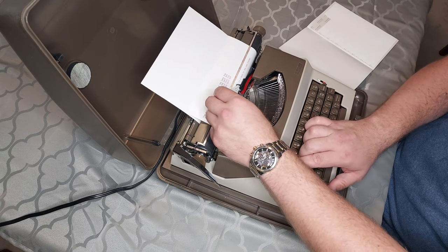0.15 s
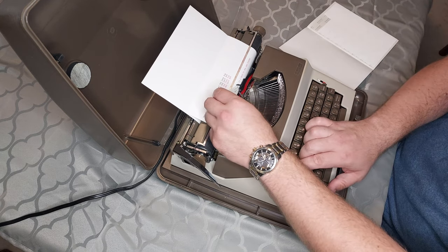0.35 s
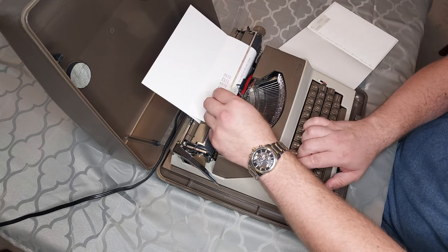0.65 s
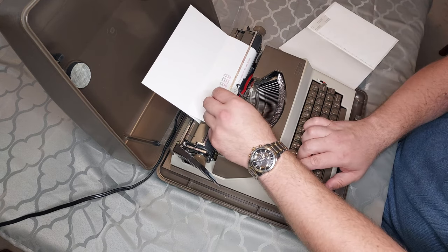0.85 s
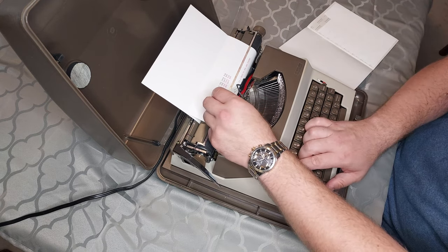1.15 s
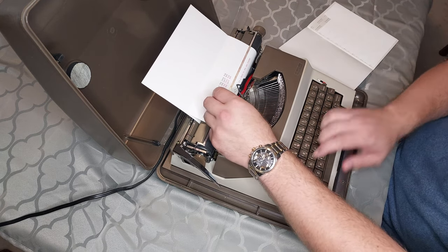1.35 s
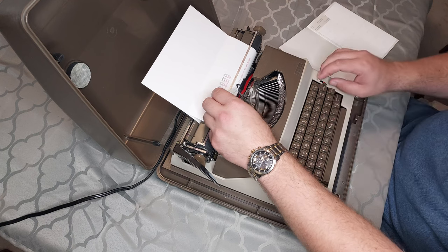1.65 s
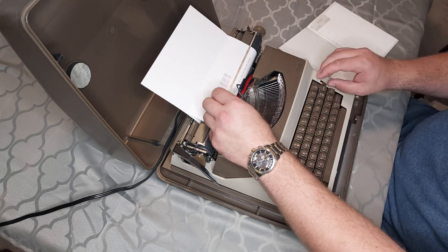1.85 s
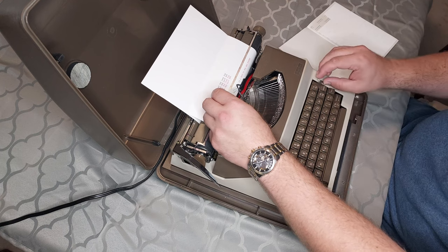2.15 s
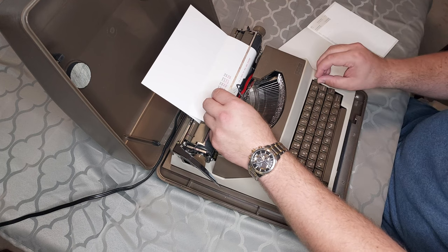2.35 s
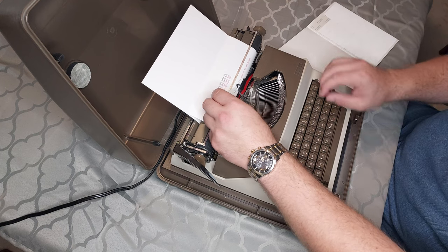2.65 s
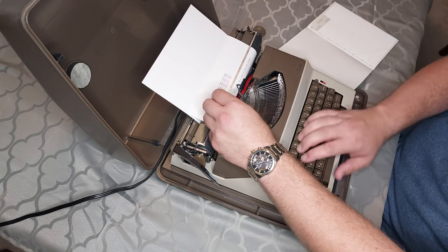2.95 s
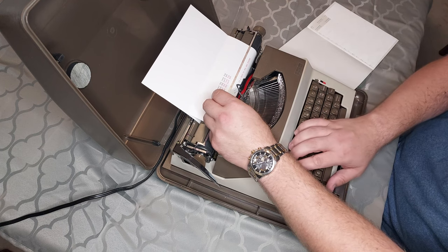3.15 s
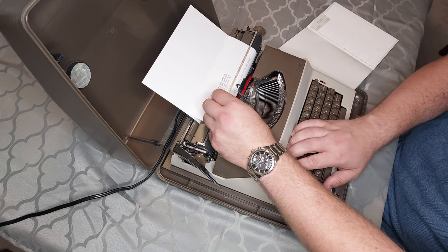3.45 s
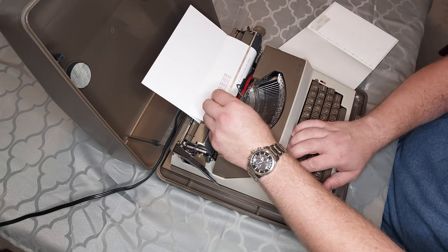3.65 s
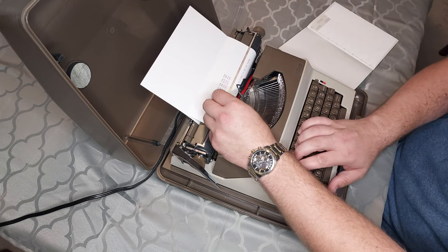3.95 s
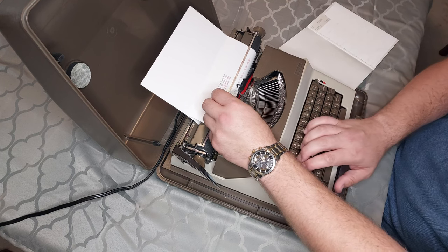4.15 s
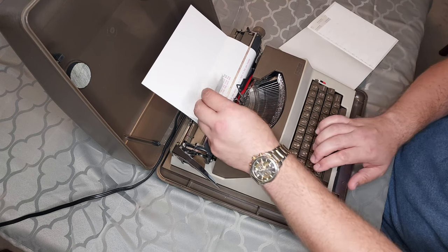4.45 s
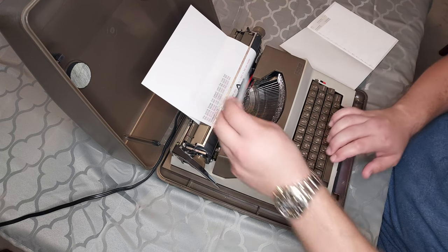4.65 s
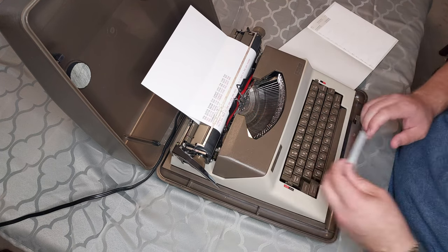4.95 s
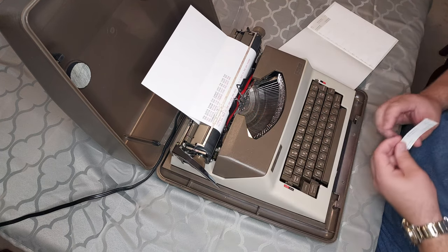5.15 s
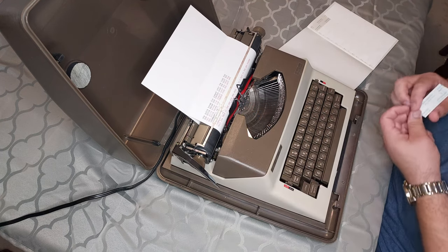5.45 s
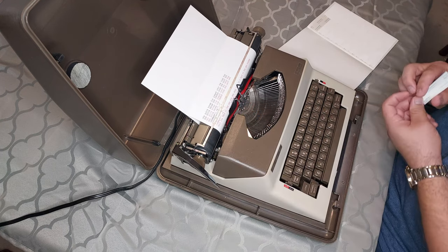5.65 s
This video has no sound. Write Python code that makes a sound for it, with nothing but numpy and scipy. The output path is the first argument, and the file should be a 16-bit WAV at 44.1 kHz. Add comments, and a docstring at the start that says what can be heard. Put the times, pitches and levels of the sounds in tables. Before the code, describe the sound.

A typewriter motor drones continuously beneath close, slightly boxy mechanical sounds. One explosive key strike comes at once, then quiet handling, two quick backspace clacks, faint bumps and a bright metal tick. Near the middle a second single keystroke snaps against the roller. Paper slides and crackles, and grainy finger rubbing continues to the end, with a short indoor room tail.

```python
"""An electric typewriter hums, whirrs and rumbles on a cloth-covered table in a small room. A key strikes,
the carriage is stepped back with clacks, and the same key strikes again through a slip of correction paper.
Fingers bump the keys and the case, then pull the slip out and rub it. Blows are bursts of coloured noise,
some with added resonances; rubbing is grainy noise; the motor is wavering tones over noise."""
import sys
import numpy as np
from scipy import signal
from scipy.fft import rfft, irfft
from scipy.io import wavfile
from scipy.ndimage import uniform_filter1d

SR = 44100
rng = np.random.default_rng(int(sys.argv[2]) if len(sys.argv) > 2 else 0)


def wav_out(sig):
    """Save sig, one row per channel (or a flat mono array), as 16-bit PCM at SR to the path in sys.argv[1]."""
    wavfile.write(sys.argv[1], SR, np.round(np.clip(np.atleast_2d(sig).T, -1, 1) * 32767).astype(np.int16))


N = 255780
TIME = np.arange(N) / SR
EDGE_HZ = 16100  # nothing is heard above this

# Stereo width of the machine's blows: [f/Hz, side minus mid/dB]
BLOW_WIDTH = [(150, -22), (300, -18), (600, -14), (1100, -9), (2200, -7), (5000, -6), (8000, -5),
              (16000, -5)]
# Stereo width of the soft, steady noises: [f/Hz, side minus mid/dB]
SOFT_WIDTH = [(10, 0.5), (50, -2.5), (130, -15), (300, -18.5), (600, -13), (1100, -7), (2200, 1.5),
              (6500, 0), (7700, -9.5), (9000, -24.5), (14000, -17)]
# One keystroke per row, all levels relative: [t/s when the type slug lands, slug level/dB, slug t60/s,
# rebound level/dB, ribbon slap level/dB, rattle level/dB, rattle delay/s, rattle gap/s,
# rattle drop per knock/dB, rocking level/dB]
KEYSTROKES = [(.0220, -5, .05, -10.5, -35.5, -20, .018, .027, 4, -26.5),
              (3.7758, -7, 0.033, -25, -18.5, -21, .009, .021, 2.2, -23)]


def amp(db):
    """Turns decibels into a gain."""
    return 10 ** (np.asarray(db) / 20)


def unit(x):
    """Scales a sound to an rms level of 1."""
    return x / np.sqrt(np.mean(x ** 2) + 1e-20)


def read(points, hz):
    """Reads a table between its points, on a log-frequency axis."""
    f, value = np.transpose(points)
    return np.interp(np.log(hz + 1), np.log(f + 1), value)


def add(mix, s, sound):
    """Mixes a sound in at time s, cutting off whatever falls outside the mix."""
    at = round(s * SR)
    sound = sound[..., max(-at, 0):]
    part = mix[:, max(at, 0):][:, :sound.shape[-1]]
    part += sound[..., :part.shape[1]]


def drift(rate_hz):
    """Makes a random wander of rms 1 that is mostly slower than rate_hz."""
    hz = np.fft.rfftfreq(N, 1 / SR)
    slow = rfft(rng.standard_normal(N)) / (1 + (hz / rate_hz) ** 4)
    return unit(irfft(slow, N))


def noise(colour, width, tilt_db=0, wider_db=0, size=N):
    """Coloured stereo noise: a part shared by both sides and a part of opposite sign. Tilt is dB per octave."""
    hz = np.fft.rfftfreq(size, 1 / SR)
    mid, side = rfft(rng.standard_normal((2, size)))
    side = side * amp(read(width, hz) + wider_db)
    gain = amp(read(colour, hz) + tilt_db * np.log2(hz + 20))
    gain = gain * (hz < EDGE_HZ)
    return unit(irfft(np.array([mid + side, mid - side]) * gain, size))


def ring(x, resonances):
    """Each resonance lifts its own narrow band and rings on."""
    for hz, width, db in resonances:
        b, a = signal.iirpeak(hz, hz / width, SR)
        x = x + (amp(db) - 1) * signal.lfilter(b, a, x)
    return x


def blows(rows, colour, wider_db=0, chatter_db=0, size=16384):
    """Each blow shakes a dense crowd of fast-dying modes, heard as a noise burst whose level chatters.

    Rows hold [t/s, level/dB, rise/s, t60/s, brightness/dB per octave]."""
    out, t = np.zeros((2, N)), np.arange(size) / SR
    for s, db, rise, t60, tilt_db in rows:
        wobble = unit(uniform_filter1d(rng.standard_normal(size), size=90))
        chatter = unit(amp(chatter_db * wobble))
        attack = np.minimum(t / rise, 1)
        decay = amp(-60 * np.maximum(t - rise, 0) / t60)
        burst = noise(colour, BLOW_WIDTH, tilt_db, wider_db, size)
        add(out, s, amp(db) * attack * decay * chatter * burst)
    return out


def rumble():
    """Deep unsteady air noise, stronger on the left, and the soft table giving under the machine."""
    # Air noise colour: [f/Hz, relative level/dB]
    colour = [(3, 2), (9, 3), (20, -8.5), (30, -11), (42, -21), (60, -22), (85, -30.5), (120, -36.5),
              (200, -52.5), (600, -85.5)]
    # A bump and the carriage's backspace jolting the machine: [t/s, level/dB, f/Hz, t60/s]
    jolts = [(1.014, -21, 68.4, 0.1), (2.216, -32, 44.9, 0.82)]
    rock_delay_s, rock_hz, rock_t60 = .028, 37, .5
    gusts = amp(2 * drift(6))
    out = amp(-27.5) * unit(noise(colour, SOFT_WIDTH) * gusts)
    out = out * amp([[2], [-2.5]])  # left, right in dB
    t = np.arange(SR) / SR
    rocking = [(s + rock_delay_s, db, rock_hz, rock_t60) for s, *_, db in KEYSTROKES]
    for s, db, hz, t60 in rocking + jolts:
        swing = np.sin(2 * np.pi * hz * t) * np.minimum(t * hz, 1)  # grows over its first cycle
        add(out, s, amp(db - 60 * t / t60) * swing)
    return out


def motor():
    """Magnetic hum at twice the mains rate, with wavering shaft tones over belt and bearing noise."""
    # Hum and shaft tones: [f/Hz, relative level/dB, unsteadiness as a share of the level]
    tones = [(120.3, -42.5, 0.045), (240.4, -49, .22), (312.5, -64, 0.65), (351, -67, 0.65),
             (792, -70, 0.34), (838, -73.5, .8)]
    # Bearing noise colour: [f/Hz, relative level/dB]
    whirr_colour = [(240, -31.5), (400, -5.5), (512, -2.5), (753, -10.5), (814, -6.5), (893, -7),
                    (1460, -15), (1580, -15.5), (2250, -19.5), (5690, -31.5), (13500, -33.5), (16000, -41)]
    # Belt and shaft droning in the case, noise colour: [f/Hz, relative level/dB]
    drone_colour = [(90, -18.5), (140, -3), (175, -9.5), (230, 0), (320, -3.5), (400, -8), (520, -20),
                    (900, -45)]
    hum = np.zeros(N)
    for hz, db, unsteady in tones:
        sway = 1 + unsteady * (drift(6) + 1j * drift(3.4)) / np.sqrt(2)  # wavers in level and phase
        turning = np.exp(2j * np.pi * (hz * TIME + rng.random()))
        hum += np.sqrt(2) * amp(db) * (sway * turning).real
    whirr = amp(-58) * noise(whirr_colour, SOFT_WIDTH) * amp(.7 * drift(25))
    drone = amp(-52.5) * noise(drone_colour, SOFT_WIDTH)
    return (hum + whirr + drone) * amp([[.3], [-.3]])  # left, right in dB


def room(x, build_s=0.012):
    """A short diffuse tail that builds up quickly, each band dying at its own speed."""
    # How long the room rings: [f/Hz, t60/s]
    ring_times = [(150, 0.99), (500, 0.49), (1500, 0.39), (4000, .32), (8000, .35), (12000, .32),
                  (16000, .25)]
    white = [(0, 0), (SR, 0)]
    hz, t, z = signal.stft(noise(white, BLOW_WIDTH, wider_db=-2.5, size=SR), SR, nperseg=256)
    fading = z * amp(-60 * t / read(ring_times, hz)[:, None])
    tail = signal.istft(fading, SR, nperseg=256)[1]
    tail = tail * np.minimum(np.arange(tail.shape[1]) / SR / build_s, 1)
    return signal.fftconvolve(x, tail / np.linalg.norm(tail[0]), axes=1)[:, :N]


def lid(x):
    """Close echoes comb the sound and give it a boxy, metallic edge."""
    # Echoes off the open lid and the table: [delay/s, level/dB]
    echoes = [(.0011, -17.5), (.0027, -14.5), (.0043, -17)]
    out = x.copy()
    for delay, db in echoes:
        add(out, delay, amp(db) * x)
    return out


def rubbing():
    """Grainy friction of skin and paper: single strokes that swell and fade, then fingers working the slip."""
    # The slip carried away and rubbed between the fingers: [t/s, relative level/dB]
    fingering = [(4.45, -75.5), (4.798, -73), (4.822, -63), (4.844, -70), (5.07, -69.5), (5.092, -65),
                 (5.164, -68), (5.246, -60), (5.292, -66), (5.348, -63), (5.396, -67), (5.404, -59),
                 (5.446, -66.5), (5.656, -71.5), (5.678, -66), (5.8, -64.5)]
    # Strokes of a hand over keys and paper: [t/s at the loudest, relative level/dB, swell/s, fade/s]
    strokes = [(1.305, -66.5, .04, 0.93), (2.185, -63, 0.14, 0.034), (3.385, -66.5, 0.061, 0.19),
               (3.58, -61.5, 0.094, 0.55), (4.335, -61, 0.24, 0.13)]
    # Friction noise colour: [f/Hz, relative level/dB]
    colour = [(1000, 0), (3000, -4.5), (6000, -2.5), (8500, 0.5), (13000, -0.5), (16000, -7.5)]
    fingering_db, stroke_db = 3, 1.5
    stroke_range_db = 19  # a stroke swells and fades by this much in its given times
    s, db = np.transpose(fingering)
    level = amp(fingering_db + np.interp(TIME, s, db)) * (TIME > s[0])
    for s, db, swell, fade in strokes:
        away = np.maximum((s - TIME) / swell, (TIME - s) / fade)
        level += amp(stroke_db + db - stroke_range_db * away)
    grain = unit(noise(colour, SOFT_WIDTH) * amp(1.7 * drift(150)))
    return uniform_filter1d(level, size=1000) * grain


def paper_snaps():
    """The slip drags out from behind the ribbon and crackles: noise bursts with a chattering level."""
    # The slip dragged out: [t/s, relative level/dB, rise/s, t60/s, brightness/dB per octave]
    pull = [(4.21, -55, .11, 0.26, -4.5)]
    # The slip crackling: [t/s, relative level/dB]
    crackles = [(4.335, -49), (4.361, -47), (5.524, -57), (5.679, -58), (5.720, -54), (5.758, -54)]
    # Paper noise colour: [f/Hz, relative level/dB]
    colour = [(800, -10), (1800, 3), (2400, 1), (3200, 2.5), (4500, 2.5), (6000, -1.5), (10000, -3),
              (16000, -18)]
    rise_s, t60, tilt_db = 0.0072, 0.073, -3
    rows = pull + [(s, db, rise_s, t60, tilt_db) for s, db in crackles]
    return amp(-1) * blows(rows, colour, wider_db=-7, chatter_db=4)


def case_bumps():
    """The hand brushes against the case, whose panels resonate."""
    # Bumps: [t/s, relative level/dB, rise/s]
    bumps = [(1.655, -50, 0.031), (2.584, -51, 0.013)]
    # Case noise colour: [f/Hz, relative level/dB]
    colour = [(150, -5), (400, 8), (650, -6), (950, 4.5), (1400, -8), (2400, -6.5), (3000, -14.5),
              (7000, -16.5), (16000, -25)]
    # Case resonances: [f/Hz, width/Hz, lift/dB]
    resonances = [(410, 51, 3.9), (800, 55.4, 4.1), (935, 210, 4.8)]
    t60, tilt_db = 0.13, -1
    rows = [(s, db, rise, t60, tilt_db) for s, db, rise in bumps]
    return amp(2.0) * ring(blows(rows, colour), resonances)


def key_knocks():
    """A fingertip knocks a key cap: a short, dull noise burst."""
    # Knocks: [t/s, level/dB, rise/s, t60/s, brightness/dB per octave]
    knocks = [(2.7175, -40.5, 0.0047, 0.076, -4)]
    # Key cap noise colour: [f/Hz, relative level/dB]
    colour = [(400, -23), (700, -9), (880, 5), (1080, -2), (1300, -11), (1650, -10), (1880, -5),
              (2200, -31), (8000, -47)]
    return blows(knocks, colour)


def metal_ticks():
    """Light metal parts tick and ring as the hand comes back, and a watch ticks near 2.97 s; harder ticks are
    brighter."""
    # Ticks: [t/s, relative level/dB]
    ticks = [(1.964, -52), (2.742, -52.5), (2.941, -50), (2.954, -49.5), (2.968, -36)]
    # Light metal noise colour: [f/Hz, relative level/dB]
    colour = [(500, -9.5), (2000, -14), (5000, -14.5), (9500, -14), (11500, -5), (14000, -7.5),
              (16000, -11)]
    # Light metal resonances: [f/Hz, width/Hz, lift/dB]
    resonances = [(5860, 300, 8.2), (7700, 260, 8.5), (8200, 190, 13), (11100, 200, 3.8), (13430, 250, 6)]
    rise_s, t60 = .0025, 0.072
    neutral_db, brightening = -39, .25  # dB per octave for each dB over the neutral level
    rows = [(s, db, rise_s, t60, brightening * (db - neutral_db)) for s, db in ticks]
    return amp(-3) * ring(blows(rows, colour, wider_db=-8.0), resonances)


def pawl_clacks():
    """The backspace pawl pulls the carriage, then lets go; each move is the same quick group of blows."""
    # Moves of the pawl: [t/s, relative level/dB, brightness/dB per octave]
    moves = [(2.208, -19.5, -0.1), (2.314, -22, -1.3)]
    # Pawl touches, catches, and the carriage settles with a dull thud:
    # [t/s after the catch, relative level/dB, t60/s, added brightness/dB per octave]
    clack = [(-.006, -9.5, 0.09, 0), (0, -1, 0.028, 0), (.0031, -2, 0.069, -1), (.018, -12.5, .14, -6.5)]
    # Carriage noise colour: [f/Hz, relative level/dB]
    colour = [(120, -20), (220, -9), (400, -8.5), (600, -2.5), (1250, -6.5), (1950, -6.5), (2800, -10),
              (4800, -10.5), (6900, -10), (10000, -6.5), (13100, -11), (16000, -16)]
    rise_s = 0.0024
    rows = [(s + after, db + part_db, rise_s, t60, tilt_db + part_tilt_db)
            for s, db, tilt_db in moves for after, part_db, t60, part_tilt_db in clack]
    return amp(-3.5) * blows(rows, colour, wider_db=-3, chatter_db=-0.5)


def lever_blows(lever_rise_s, count=3):
    """The linkage throws the typebar; it falls back in ever weaker, duller knocks, with a low thud at its rest."""
    # Key, clutch, cam and lever throw the typebar, and later the key springs back:
    # [t/s relative to the slug landing, relative level/dB, t60/s, brightness/dB per octave]
    cycle = [(-.0732, -40.5, .035, -2), (-.0514, -37.5, .05, 2.5), (-.0387, -25, .19, 1.5),
             (-.0312, -26, .3, 0), (.297, -59, .14, 2), (.351, -58, .04, 2)]
    cycle_db, cycle_rise_s = -1, .0013
    rattle_t60, rattle_tilt_db, dulling_db = .1, 2, 1.43
    rest_s, rest_db, rest_rise_s, rest_t60, rest_tilt_db = 0.062, -28.5, 0.0048, 0.16, -0.5
    for s, *_, rattle_db, delay, gap, drop_db, _ in KEYSTROKES:
        for after, db, t60, tilt_db in cycle:
            yield s + after, cycle_db + db, cycle_rise_s, t60, tilt_db
        for k in range(count):
            tilt_db = rattle_tilt_db - k * dulling_db
            yield s + delay + k * gap, rattle_db - k * drop_db, lever_rise_s, rattle_t60, tilt_db
        yield s + rest_s, rest_db, rest_rise_s, rest_t60, rest_tilt_db


def typebar_levers(lever_rise_s):
    """The blows of the linkage and the falling typebar shake the metal frame, which rings on."""
    # Frame noise colour: [f/Hz, relative level/dB]
    colour = [(60, -14), (130, 4), (260, -1.5), (480, -5), (800, -8), (1200, -11), (2200, -12), (5000, -13),
              (7000, -14.5), (8000, -13), (11000, -16.5), (16000, -25.5)]
    # Frame resonances: [f/Hz, width/Hz, lift/dB]
    resonances = [(303, 21, 1.7), (425, 25, 3), (726.3, 28, 3.8), (812, 20, 11), (1040, 20, 4),
                  (1336, 30, 11), (2310, 120, 3), (7900, 300, 6)]
    rows = lever_blows(lever_rise_s)
    return amp(0.5) * ring(blows(rows, colour, chatter_db=4.0), resonances)


def slug_blows(lever_rise_s):
    """In each keystroke the slug slaps the ribbon, hits the platen, and rebounds."""
    ribbon_lead_s, ribbon_t60, ribbon_tilt_db = .0057, 0.18, 2.5  # ribbon and slip come before the platen
    slug_rise_s, slug_tilt_db = 0.00024, 0.8  # tilts are brightness in dB per octave
    rebound_s, rebound_t60, rebound_tilt_db = .0086, .06, -2  # the slug rebounds just after
    for s, db, t60, rebound_db, ribbon_db, *_ in KEYSTROKES:
        yield s - ribbon_lead_s, ribbon_db, lever_rise_s, ribbon_t60, ribbon_tilt_db
        yield s, db, slug_rise_s, t60, slug_tilt_db
        yield s + rebound_s, rebound_db, slug_rise_s, rebound_t60, rebound_tilt_db


def slug_strikes(lever_rise_s):
    """The type slug's sharp blows on ribbon and platen, as bright noise bursts."""
    # Slug noise colour: [f/Hz, relative level/dB]
    colour = [(88, -39.5), (150, -12.5), (805, -9), (1190, -12.5), (1310, -9), (1940, -8.5), (3920, -4.5),
              (6510, -4.5), (7620, -2), (9440, -8), (13700, -1), (16000, -17.5)]
    return amp(1) * blows(slug_blows(lever_rise_s), colour, chatter_db=-1.5)


def scene():
    """The machine's blows and the handling sounds in the room, over the idling motor."""
    # Resonances of the slug: [f/Hz, width/Hz, lift/dB]
    slug_rings = [(3926, 250, 5), (5720, 180, 5), (7300, 200, 4), (8200, 250, 1.7), (8650, 200, 4),
                  (10300, 420, 6.8), (11500, 270, 4), (12600, 200, 1.5)]
    # Resonances of the carriage: [f/Hz, width/Hz, lift/dB]
    carriage_rings = [(537, 46, 4.6), (848, 23, 6.3), (1330, 52, 3.1), (2000, 51, 2), (2440, 54, 8.3),
                      (3405, 92, 12.4), (3800, 72, 4.8), (6620, 910, 7.2)]
    lever_rise_s = .0016  # shared by the ribbon slap and the typebar's rattle
    background = motor() + rumble()
    hands = metal_ticks() + case_bumps() + key_knocks() + paper_snaps()
    pawl = pawl_clacks()
    levers = typebar_levers(lever_rise_s)
    strikes = slug_strikes(lever_rise_s)
    # the narrow peaks of slug and carriage carry straight to the microphone; the room mixes all directions
    direct = ring(strikes, slug_rings) + ring(pawl, carriage_rings) + levers + hands
    wet = room(amp(-13.0) * strikes + amp(-12.0) * levers + amp(-9.5) * pawl + amp(-9.0) * hands)
    machine = (lid(direct) + wet) * amp([[0], [-.6]])  # left, right in dB
    return machine + rubbing() + background


def record(dry):
    """Flattens any peak beyond full scale, as an overloaded input does, then removes the highest treble."""
    lowpass = signal.firwin(511, EDGE_HZ, window=("kaiser", 8), fs=SR)
    return signal.oaconvolve(np.clip(dry, -1, 1), lowpass[None], "same")


dry = scene()
out = record(dry)
wav_out(out)
```